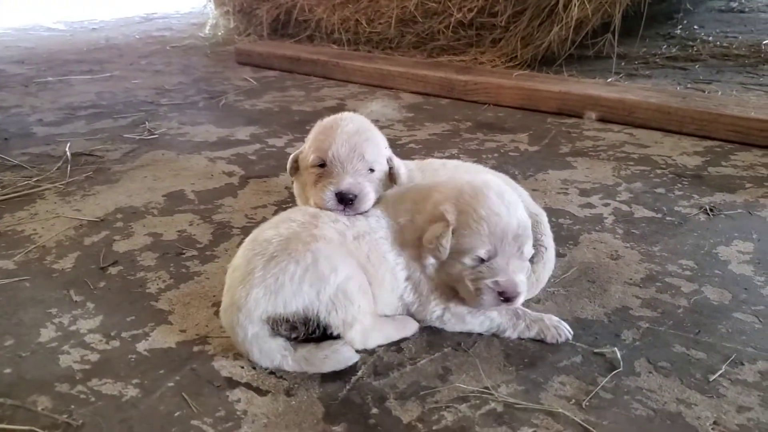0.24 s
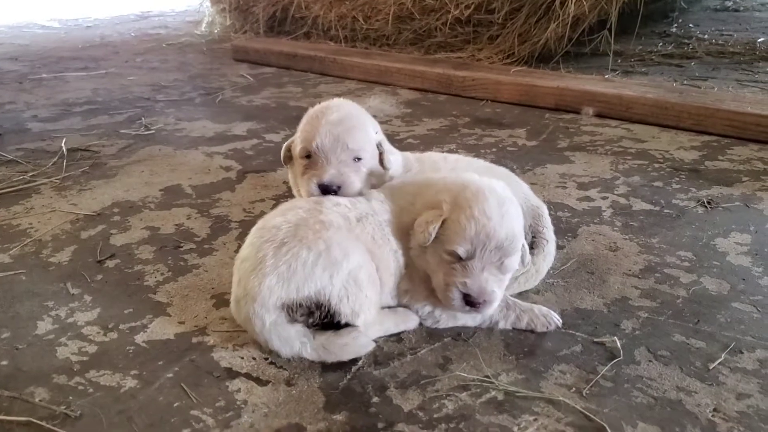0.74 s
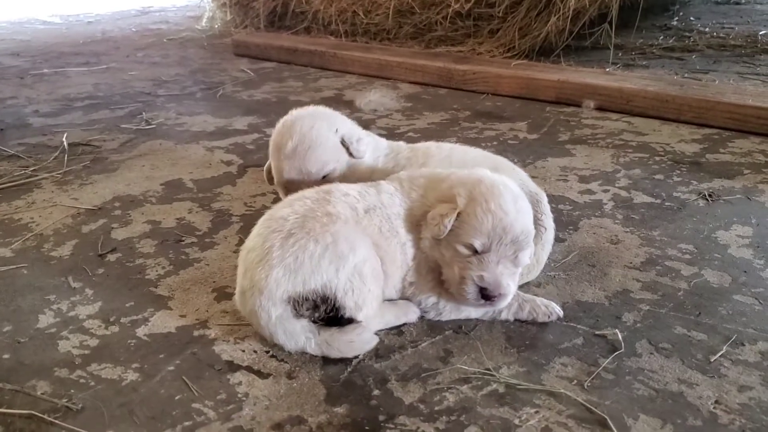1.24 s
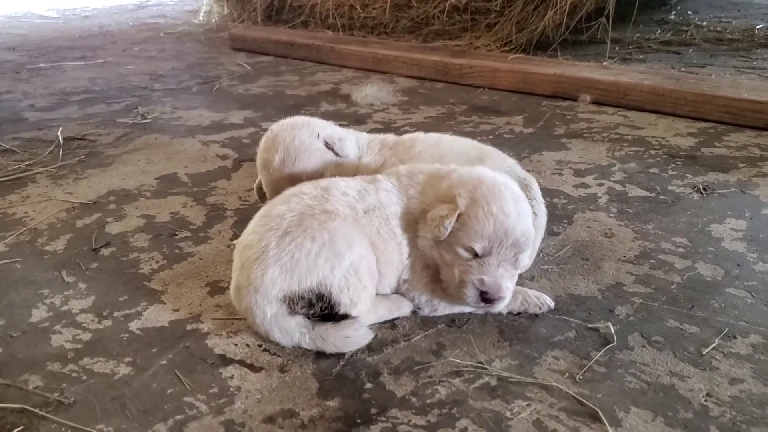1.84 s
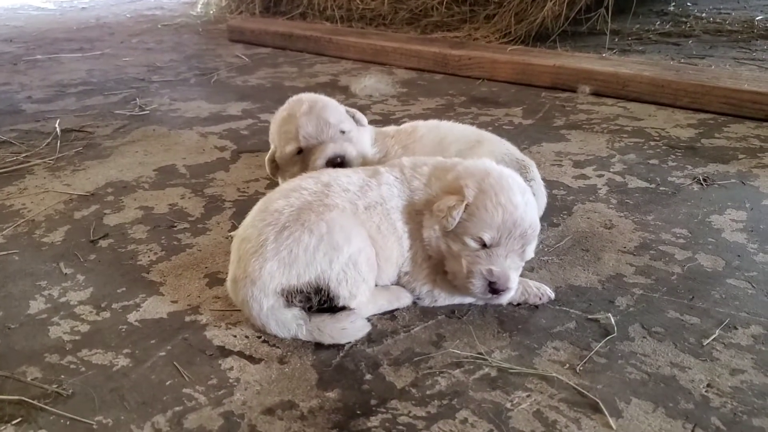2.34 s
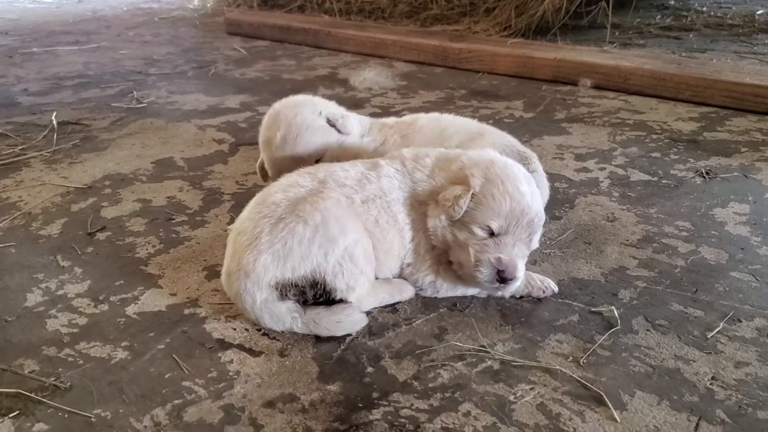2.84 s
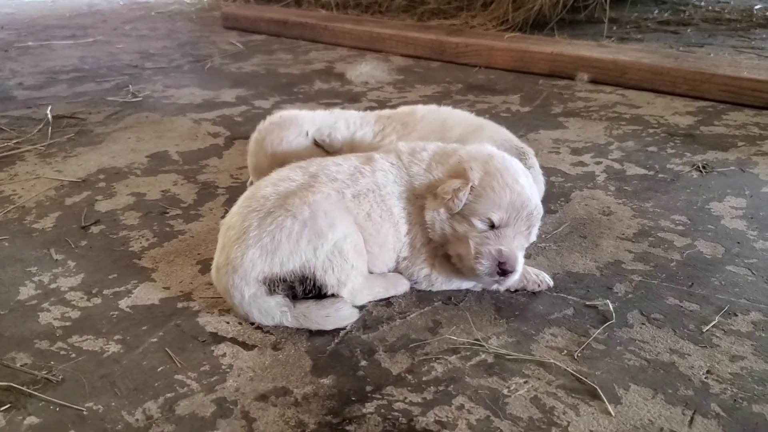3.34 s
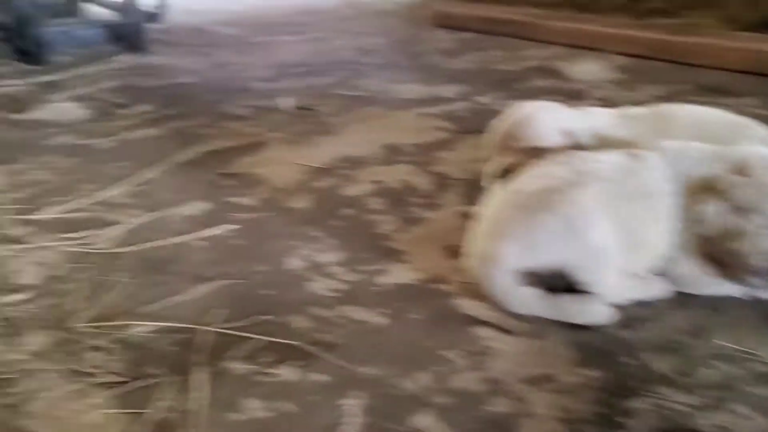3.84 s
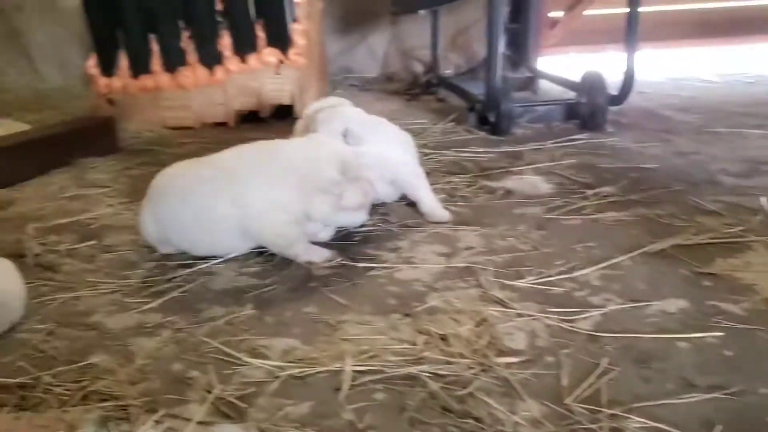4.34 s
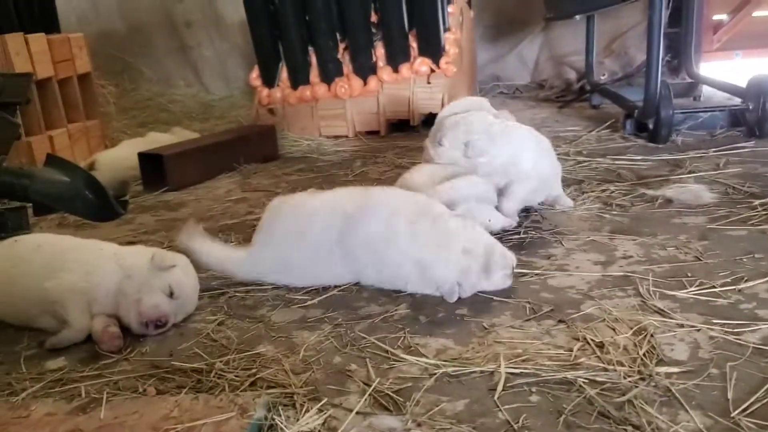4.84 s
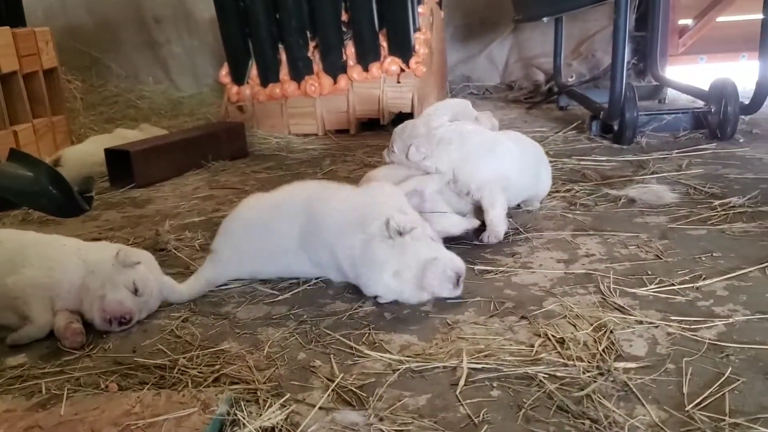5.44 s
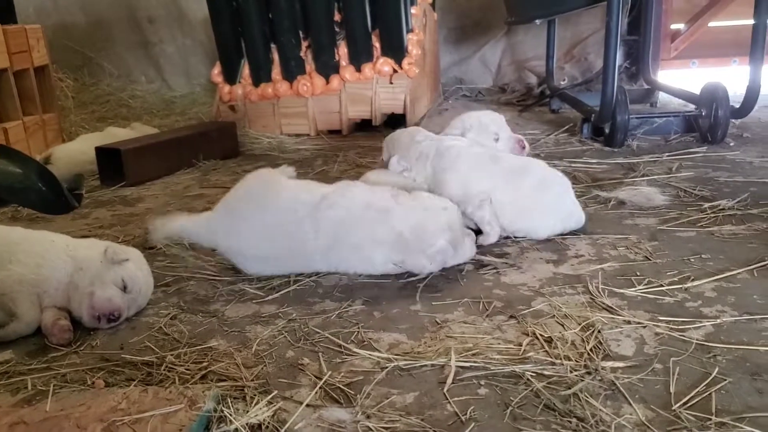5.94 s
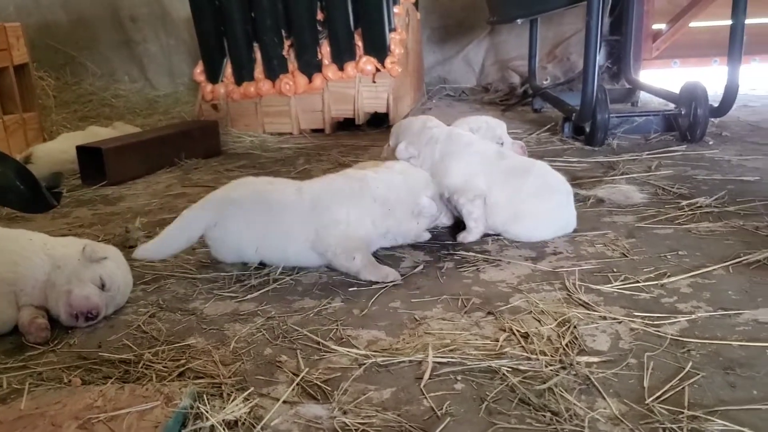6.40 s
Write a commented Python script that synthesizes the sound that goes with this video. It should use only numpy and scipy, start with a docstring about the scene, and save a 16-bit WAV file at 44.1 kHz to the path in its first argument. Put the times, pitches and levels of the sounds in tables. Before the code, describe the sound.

A young puppy, close to a hand-held phone in a barn, gives two short hoarse grunts, at the start and at 0.5 seconds. From 0.9 to 2 seconds it groans through its nose, the wavering pitch sinking and breaking into throat clicks. Between 2.3 and 3.3 seconds come four high, arching squeals, the last three the loudest, each with a brief echo. From 3.5 to about 6.2 seconds a run of short, lower whimpers follows, with soft nose puffs; the strongest rises in pitch at 5.1 seconds. Two very faint nose whistles come near 4.7 seconds. Dry taps sound close by, mostly on the right, clearest at about 1.5 and 2.8 seconds, with one on the left at 4 seconds. Faint paw scuffs on concrete and thin snaps of straw are scattered through. Still air and a low, uneven rumble lie underneath.

```python
"""Puppies on a barn floor

Young puppies lie on concrete, a step from a hand-held phone. One grunts twice and groans through its
nose until the voice breaks into clicks; four squeals and a run of short whimpers follow. Each voice is
a train of vocal-fold pulses coloured by snout, muzzle or mouth. Noses puff and squeak, paws scuff,
straw snaps and small taps sound up close, while the barn answers the louder calls over a low rumble."""
import sys
import numpy as np
from scipy import signal
from scipy.fft import rfft, irfft
from scipy.io import wavfile
from scipy.ndimage import uniform_filter1d, map_coordinates

SR = 44100
rng = np.random.default_rng(int(sys.argv[2]) if len(sys.argv) > 2 else 0)


def wav_out(sig):
    """Save sig, one row per channel (or a flat mono array), as 16-bit PCM at SR to the path in sys.argv[1]."""
    wavfile.write(sys.argv[1], SR, np.round(np.clip(np.atleast_2d(sig).T, -1, 1) * 32767).astype(np.int16))


N = 294147
T = np.arange(N) / SR

# EQ curves, all (frequency [Hz], gain [dB])
AIR_EQ = [(30, -5.5), (90, -8.5), (200, -16), (400, -26.5), (900, -26), (1700, -20.5), (3500, -30.5),
          (7000, -27.5), (14500, -28)]  # still barn air
RUMBLE_EQ = [(20, -13), (45, -8.5), (70, -2.5), (110, -9.5), (180, -19.5), (400, -30.5), (1500, -69)]  # hand and draught
BARN_EQ = [(100, -12), (500, 3), (1200, -3.5), (2500, 10.5), (5000, 3.5), (8000, 9.5), (14500, 5)]  # echo off walls and roof
NOSE_HISS_EQ = [(1000, 0), (2000, -3), (4000, -5.5), (6500, -7), (9000, -5.5), (12000, -0.5), (14500, 0.5)]  # breath through the nostrils
STRAW_EQ = [(800, -23), (3000, -4), (8000, -2), (13000, -2.5)]  # a snapping stalk
SCUFF_EQ = [(80, -13.5), (400, 5.5), (1400, -3), (2500, -7), (4300, -7.5), (7000, -20.5), (10000, -22.5),
            (14500, -25.5)]  # paws on concrete
CRACK_EQ = [(100, -5.5), (700, 7.5), (1500, 0.5), (3200, -9), (5300, -13.5), (9500, -24), (11500, -12.5),
            (14500, -30.5)]  # the attack of a tap
SNOUT_EQ = [(120, -24.5), (260, -2), (420, -5.5), (650, 4), (850, 4.5), (1100, -5), (1400, -13), (1900, -4),
            (2600, -44.5), (4500, -35.5), (9500, -22.5), (10800, -16), (12000, -32), (14500, -50)]  # voice through the nose
GROAN_AIR_EQ = [(1000, 5.5), (2000, -2.5), (4000, -7.5), (6500, -4), (9000, -8), (10700, -3), (12500, -4.5),
                (14500, -9.5)]  # air leaking with the groan
MUZZLE_EQ = [(120, -27.5), (250, -3.5), (520, -5.5), (850, -3), (1100, -11), (1380, -15), (1750, -12.5),
             (2300, -22), (2900, -39.5), (4000, -56), (5400, -34.5), (7000, -45.5), (11000, -32.5),
             (14500, -52)]  # voice through a nearly shut muzzle
MOUTH_SHUT_EQ = [(200, -28), (500, -8.5), (800, 4), (1300, -2.5), (1700, -7.5), (2500, -26), (3200, -32.5),
                 (4000, -51), (5200, -22), (6800, -36), (9500, -22), (11500, -39.5), (14500, -37)]  # squeal, mouth shut
MOUTH_OPEN_EQ = [(300, -40), (800, 2.5), (1300, 7.5), (1900, 4.5), (2500, -2.5), (3100, -17.5), (3750, -6),
                 (4300, -14.5), (4950, -6), (5800, -20), (7400, -10.5), (9500, -19.5), (11000, -39.5),
                 (14500, -39.5)]  # squeal, mouth open

# fader ride on the rumble of hand and draught: (time [s], gain [dB])
RUMBLE_RIDE = [(0, -60.5), (1.0, -55), (1.6, -55.5), (2.2, -58), (3.6, -64.5), (4.3, -62), (5.4, -59.5),
               (6.67, -61)]
# the phone turns to face the litter: (time [s], lead at the left port [ms])
BEARING = [(2.0, 0.387), (3.5, 0.445), (4.2, 0.2174), (4.9, 0.0512), (6.2, 0.072)]
# straws snapping: (time [s], peak [dB], left minus right [dB])
STRAW_SNAPS = [(0.653, -33, -15.5), (1.904, -38.5, -18), (1.916, -44.5, -20.5), (4.62, -45, 13.5),
               (4.949, -39.5, 11.5), (5.844, -47, 16.5), (6.109, -43.5, 4.5)]
# paws dragging: (centre [s], half width [s], level [dB], left minus right [dB])
SCUFFS = [(0.701, 0.0262, -53.5, -14), (0.748, 0.0462, -56.5, -11), (1.649, 0.034, -45, -17.5),
          (4.049, 0.0463, -55, 19.5)]
# close taps: (time [s], gain [dB], ring pitch [Hz], ring t60 [s], relative crack [dB],
#  relative thump [dB], left minus right [dB])
TAPS = [(0.653, -53.5, 600, 0.0091, -9, 3, -24), (0.683, -27.5, 584, 0.00526, -17.5, -11, -18.5),
        (1.4622, -18, 1138, 0.00288, -35, -19, -19.5), (1.605, -35, 1007, 0.0157, 1.5, -10, -14),
        (1.904, -38, 696, 0.017, 3.5, -9, -16), (2.097, -53, 4500, 0.006, -8, -18, -14.5),
        (2.7513, -15.5, 764, 0.014, -0.5, -20, -29.5), (3.354, -27.5, 795, 0.0106, 8, -36, -20),
        (3.9888, -24.5, 436, 0.02115, -12, -25.5, 28)]
# nose whistles: (time [s], length [s], start pitch [Hz], end pitch [Hz], level [dB])
SQUEAKS = [(4.624, .06, 3748, 2985, -65.5), (4.797, 0.08, 3320, 3520, -71.5)]
# hoarse grunts: (time [s], length [s], start pitch [Hz], pulse gain [dB])
GRUNTS = [(.002, 0.11, 243.3, -13.5), (.47, .088, 235.9, -12.5)]
# pitch line of the long groan: (time [s], pulse rate [Hz])
GROAN_PITCH = [(0.92, 179.9), (0.942, 208.7), (1.014, 188.8), (1.098, 216.2), (1.186, 209.9), (1.262, 226),
               (1.352, 194.5), (1.42, 210.6), (1.476, 172.7), (1.52, 200), (1.738, 137.7), (1.8, 95.55)]
# lone throat clicks after the groan: (time [s], pulse gain [dB])
THROAT_CLICKS = [(2.037, -18), (2.146, -16), (2.221, -26), (2.389, -10), (2.427, -15), (2.459, -16.5)]
# short low calls: (time [s], length [s], start pitch [Hz], crest pitch [Hz], end pitch [Hz],
#  level [dB], roughness [0-1], attack softness [exponent])
WHIMPERS = [ (1.813, 0.0417, 305.5, 321.2, 293.4, -44.5, 0.04, 0.7),
            (2.05, 0.0406, 328, 320.5, 300.6, -43, 0.05, 1.04),
            (3.47, 0.0619, 445.1, 429.4, 418, -34.5, 0.13, 0.265),
            (3.715, 0.032, 346.5, 354.2, 329, -43, 0.1, .35),
            (3.94, 0.0304, 346.5, 323, 318, -45, .09, 0.38),
            (4.169, 0.0439, 344.4, 368.6, 351.4, -39.5, 0.13, 0.445),
            (4.425, 0.0382, 202, 218.2, 217, -51.5, 0.07, .8),
            (4.689, 0.0419, 231, 258.6, 230.7, -58, 0.42, 1),
            (4.888, 0.046, 253, 246.5, 225.6, -43.5, 0.4, 1.18),
            (5.105, .094, 279.8, 420.7, 547.8, -28.5, .07, 1.49),
            (5.405, .058, 248.4, 326, 350.4, -35, 0.17, 0.79),
            (5.676, 0.0473, 273.3, 312.2, 251.1, -38, 0.13, 0.79),
            (5.924, 0.0395, 229.6, 257.4, 227, -56.5, 0.34, 1),
            (6.143, 0.0485, 198.1, 214.6, 223.4, -51, 0.09, 1)]
# high cries: (time [s], length [s], low pitch [Hz], top pitch [Hz], climb after [s], crest after [s],
#  slide from the crest [Hz/s], open-mouth level [dB], mouth opens after [s], added opening [0-1],
#  rasp after [s], rasp half width [s], rasp [0-1])
SQUEALS = [ (2.279, 0.06365, 745.7, 924.2, .024, 0.052, -1500, -24.5, 0.0307, 0, .044, .009, 1),
           (2.506, 0.1254, 735.4, 1344, .03, 0.0534, -3400, -13, .078, 0.5, .074, 0.022, 0.1),
           (2.793, .124, 616.9, 1278, .03, .064, 9001.5, -13.5, .054, 0.36, .078, .022, .78),
           (3.102, 0.1511, 626, 1348, 0.03012, 0.0664, -3700, -10, 0.05884, .3, 0.0644, 0.017, 0.16)]

PLAIN_DB = -40.5  # a middling whimper; louder ones are brighter and end in a stronger puff


def undb(db):
    """Decibels to gain."""
    return 10 ** (np.asarray(db) / 20)


def unit(x):
    """Scale to rms 1."""
    return x / np.sqrt(np.mean(x ** 2))


def steady(x, window_s=0.0074):
    """Hold the short-term rms at 1."""
    return x / np.sqrt(np.abs(uniform_filter1d(x ** 2, int(window_s * SR))) + 1e-9)


def ramp(x):
    """Rise from 0 to 1 and stay there."""
    return np.clip(x, 0, 1)


def ease(x):
    """Smooth step from 0 to 1 around x = 0."""
    return (1 + np.tanh(x / 2)) / 2


def waver(size, rate_hz=45):
    """Smooth random modulation of rms 1."""
    width = int(SR / rate_hz)
    return unit(uniform_filter1d(uniform_filter1d(rng.standard_normal(size), width), width))


def colour(x, curve):
    """Minimum-phase EQ along a curve of (frequency [Hz], gain [dB])."""
    size = 2048
    hz, db = np.transpose(curve)
    grid = np.maximum(np.fft.rfftfreq(size, 1 / SR), 1)
    cepstrum = irfft(np.log(undb(np.interp(np.log(grid), np.log(hz), db))))
    cepstrum[1:size // 2] *= 2
    cepstrum[size // 2 + 1:] = 0
    return signal.fftconvolve(x, irfft(np.exp(rfft(cepstrum))))[:len(x)]


def noise(curve, size=N):
    """Coloured noise of rms 1."""
    return unit(colour(rng.standard_normal(size), curve))


def wide_noise(curve):
    """Coloured noise, independent left and right."""
    return np.array([noise(curve), noise(curve)])


def place(x, pan_db=0, lead_ms=0):
    """Pan between two microphone ports: the nearer one hears it earlier or louder."""
    late = map_coordinates(x, [np.arange(len(x)) - lead_ms * SR / 1000], order=5)
    return np.array([x * undb(pan_db / 2), late * undb(-pan_db / 2)])


def add(out, start, x):
    """Mix a sound in at a start time in seconds."""
    i = max(int(start * SR), 0)
    out[:, i:i + x.shape[1]] += x[:, :N - i]


def background(trim_db=-3):
    """The bed: still barn air and the uneven rumble of hand and draught."""
    air = wide_noise(AIR_EQ) * undb(-63.5)
    rumble = place(noise(RUMBLE_EQ), pan_db=-2) + wide_noise(RUMBLE_EQ)
    return air + rumble * undb(np.interp(T, *np.transpose(RUMBLE_RIDE)) + trim_db)


def barn(send, low_t60=0.232, high_t60=0.3415, predelay_s=0.0015, build_s=0.0015):
    """Diffuse echo of walls and roof in two bands, different at each port."""
    t = np.arange(int(.7 * SR)) / SR
    out = []
    for channel in send:
        low = noise([(1500, -6.0), (4000, -21.5), (9000, -47)], len(t))
        high = noise([(1000, -29.5), (3000, 0.0)], len(t))
        tail = 0.5244 * low * undb(-60 * t / low_t60) + high * undb(-60 * t / high_t60)
        tail *= ramp((t - predelay_s) / build_s)
        response = colour(tail / np.linalg.norm(tail), BARN_EQ)
        out.append(signal.fftconvolve(channel, response)[:N])
    return np.array(out)


def nose(snuffle_db=-79, puff_db=-64, puff_delay_s=.014, puff_half_s=.038):
    """Thin hiss from the nostrils: faint snuffling, and a puff as each whimper ends."""
    flow = undb(snuffle_db + 4 * waver(N, rate_hz=27))
    for start, length, _, _, _, db, _, _ in WHIMPERS:
        puff = np.exp(-((T - start - length - puff_delay_s) / puff_half_s) ** 2)
        flow += puff * undb(puff_db + 1.0454 * (db - PLAIN_DB))
    hiss = noise(NOSE_HISS_EQ) + wide_noise(NOSE_HISS_EQ)
    return hiss * flow


def straw(t60=0.0115):
    """Dry stalks give way with a thin tick."""
    out = np.zeros((2, N))
    t = np.arange(SR // 20) / SR
    for start, db, pan_db in STRAW_SNAPS:
        snap = noise(STRAW_EQ, len(t)) * undb(-60 * t / t60)
        add(out, start, place(snap / np.abs(snap).max() * undb(db), pan_db))
    return out


def scuffs(grain_db=3.5):
    """Paws and fur drag over gritty concrete in swells of tiny slips."""
    out = np.zeros((2, N))
    for centre, half, db, pan_db in SCUFFS:
        u = np.linspace(-2, 2, int(4 * half * SR))
        slips = rng.standard_normal(len(u))
        slips *= undb(grain_db * np.minimum(rng.exponential(size=len(u)), 2 * np.pi))
        drag = unit(colour(slips, SCUFF_EQ)) * np.exp(-u ** 2)
        add(out, centre - 2 * half, place(drag * undb(db), pan_db))
    return out


def taps(ring_db=-3, crack_t60=0.0033, grit=0.25, thump_hz=78, thump_t60=0.068):
    """Dry taps close to the microphone: a crack, a dead ring and a soft thump."""
    out = np.zeros((2, N))
    t = np.arange(SR // 10) / SR
    for start, db, ring_hz, ring_t60, crack_db, thump_db, pan_db in TAPS:
        contact = (t == 0) + grit * rng.standard_normal(len(t)) * undb(-60 * t / crack_t60)
        crack = colour(contact, CRACK_EQ)
        crack *= undb(crack_db) / np.abs(crack).max()
        ring = np.sin(2 * np.pi * ring_hz * t) * undb(ring_db - 60 * t / ring_t60)
        thump = np.sin(2 * np.pi * thump_hz * t) * undb(thump_db - 60 * t / thump_t60)
        add(out, start, place((crack + ring + thump) * undb(db), pan_db))
    return out


def squeaks(wobble=.05):
    """Faint, unsteady whistles from a puppy's nose."""
    out = np.zeros((2, N))
    for start, length, start_hz, end_hz, db in SQUEAKS:
        u = np.linspace(0, 1, int(length * SR))
        hz = (start_hz + (end_hz - start_hz) * u) * (1 + wobble * waver(len(u), rate_hz=500))
        whistle = np.sin(2 * np.pi * np.cumsum(hz) / SR) * np.sin(np.pi * u)
        add(out, start, place(whistle * undb(db)))
    return out


def folds(hz, roughness, jitter=0.4246, shimmer_db=4, doubling=0.49, leak=0.418):
    """Vocal folds pulse once a cycle; roughness scatters pulses, weakens every second one, leaks air."""
    phase = np.cumsum(hz) / SR
    cycles = np.arange(1, int(phase[-1]))
    at = np.interp(cycles, phase, np.arange(len(hz)))
    rough = ramp(roughness[at.astype(int)])
    chance = rng.standard_normal((len(at), 2))
    at = at + jitter * rough * chance[:, 0] * SR / hz[at.astype(int)]
    strength = undb(shimmer_db * rough * chance[:, 1]) * (1 + doubling * rough * (-1) ** cycles)
    # a windowed sinc lets each pulse land between samples
    samples = at.astype(int)[:, None] + np.arange(-7, 9)
    offset = samples - at[:, None]
    shapes = strength[:, None] * np.sinc(offset) * np.cos(np.pi * offset / 16) ** 2
    pulses = np.bincount(np.clip(samples, 0, len(hz) - 1).ravel(), shapes.ravel(), len(hz))
    airflow = leak * roughness * np.sqrt(hz / SR) * (1 + np.cos(2 * np.pi * phase))
    return pulses - hz / SR + airflow * rng.standard_normal(len(hz))


def grunts(sag=0.52, roughness=0.186):
    """Short hoarse grunts through the snout that swell and sag in pitch."""
    out = np.zeros((2, N))
    for start, length, start_hz, db in GRUNTS:
        u = np.linspace(0, 1, int(length * SR))
        pulses = folds(start_hz * (1 - sag * u ** 2), np.full(len(u), roughness))
        swell = np.abs(np.sin(np.pi * u)) ** 1.52
        voice = colour(pulses * swell * undb(db), SNOUT_EQ)
        muffled = colour(voice, [(450, 2.5), (1600, -4.5)])  # by fur
        add(out, start, place(muffled, pan_db=-1))
    return out


def groan(start_s=.912, crest_s=1.307, end_s=2.03, attack_s=0.023, release_s=0.154, slacken_s=.27):
    """Slack, wavering folds ring the snout and slow into single clicks; air leaks most at the crest."""
    pulse_db, fade_db_per_s, tremble_db = -12.5, -8, 1.22
    roughness, wobble = .07, .008
    air_db, air_half_s = -51.5, 0.259
    times, pitches = np.transpose(GROAN_PITCH)
    t = np.arange(start_s, end_s, 1 / SR)
    slowing = np.exp(-np.maximum(t - times[-1], 0) / slacken_s)
    hz = np.interp(t, times, pitches) * slowing * (1 + wobble * waver(len(t)))
    db = pulse_db + fade_db_per_s * np.abs(t - crest_s) + tremble_db * waver(len(t))
    envelope = undb(db) * ramp((t - start_s) / attack_s) * ramp((t[-1] - t) / release_s) ** .5
    pulses = np.zeros((1, N))
    add(pulses, start_s, folds(hz, np.full(len(t), roughness))[None] * envelope)
    for at, click_db in THROAT_CLICKS:
        pulses[0, int(at * SR)] += undb(click_db)
    leak = undb(air_db) * np.exp(-((T - crest_s) / air_half_s) ** 2)
    return place(colour(pulses[0], SNOUT_EQ), pan_db=-1) + leak * wide_noise(GROAN_AIR_EQ)


def whimpers(crest=.55, fray=4.186, brightening=1.105, scatter=.02, scatter_t60=.075):
    """Short low calls through a nearly shut muzzle, each swelling and dying away."""
    out = np.zeros((2, N))
    t = np.arange(SR // 40) / SR
    for start, length, start_hz, crest_hz, end_hz, db, roughness, softness in WHIMPERS:
        u = np.linspace(0, 1, int(length * SR))
        hz = np.interp(u, [0, crest, 1], [start_hz, crest_hz, end_hz])
        voice = colour(folds(hz, roughness * fray * u ** 2), MUZZLE_EQ)  # starts clean, then frays
        voice = colour(voice, [(305.8, 0), (1287, brightening * (db - PLAIN_DB))])
        # the muzzle opens with the push and lets the upper overtones out
        push = np.interp(u, [0, crest, 1], [0, 1, 0]) ** np.where(u < crest, softness, .9)
        voice = push * voice + (1 - push) * colour(voice, [(700, -0.5), (2200, -15.5)])
        # floor and litter mates scatter it within milliseconds
        reflections = (t == 0) + scatter * rng.standard_normal(len(t)) * undb(-60 * t / scatter_t60)
        voice = signal.fftconvolve(voice, reflections)[:len(u)]
        lead_ms = np.interp(start, *np.transpose(BEARING))
        add(out, start, place(unit(voice) * push * undb(db), lead_ms=lead_ms))
    return out


def squeals(attack_s=0.0069, release_s=0.0233, fade_db_per_s=-110, shake_db=1.93):
    """High arching cries; the overtones burst out as the mouth opens."""
    start_hz, dip_s, climb_s = 955.4, .004, .005
    quaver, drop, drop_s = .012, 0.24, .026
    shut_db, strain_db_per_octave = -29.5, 6.5
    opening_s, ajar, shut_rough, open_rough = .002, .02, .11, .07
    out = np.zeros((2, N))
    for (start, length, low_hz, top_hz, climb_at, crest_at, slide,
         open_db, open_at, gape, rasp_at, rasp_half, rasp) in SQUEALS:
        t = np.arange(int(length * SR)) / SR
        # pitch: a dip from above, a climb, a slide from the crest on, a drop at the end
        climb_hz = low_hz + (top_hz - low_hz) * ease((t - climb_at) / climb_s)
        hz = climb_hz + (start_hz - low_hz) * np.exp(-t / dip_s) + slide * np.maximum(t - crest_at, 0)
        hz *= 1 - drop * ramp(1 - (length - t) / drop_s) ** 1.4
        hz *= 1 + quaver * ramp((t - climb_at) / climb_s) * waver(len(t), rate_hz=220)
        # level: grows with the climb while the mouth is shut, jumps as it opens, then fades
        opened = ease((t - open_at) / opening_s)
        strained_db = shut_db + strain_db_per_octave * np.log2(climb_hz / low_hz)
        db = (1 - opened) * strained_db + opened * (open_db + fade_db_per_s * (t - open_at))
        db += shake_db * waver(len(t), rate_hz=300)
        envelope = undb(db) * ramp(t / attack_s) * ramp((length - t) / release_s)
        rasp_burst = rasp * np.exp(-((t - rasp_at) / rasp_half) ** 2)
        roughness = ramp((1 - opened) * shut_rough + opened * open_rough + rasp_burst)
        pulses = folds(hz, roughness ** 1.5)  # clean until the folds are driven hard
        mouth = ramp(ajar + gape * opened)
        voice = (1 - mouth) * colour(pulses, MOUTH_SHUT_EQ) + mouth * colour(pulses, MOUTH_OPEN_EQ)
        voice = colour(voice, [(top_hz * .22, -14), (top_hz * .45, 0)])  # little rasp below the pitch
        add(out, start, place(steady(voice) * envelope, lead_ms=0.4545))
    return out


def scene(cries_send_db=-12, near_send_db=-26):
    """The mix: the cries fill the barn; the small sounds close by stay almost dry."""
    cries = squeals() + whimpers() + squeaks()
    near = grunts() + groan() + taps() + scuffs() + straw()
    echo = barn(cries * undb(cries_send_db) + near * undb(near_send_db))
    return cries + near + echo + nose() + background()


def record(dry, low_hz=38, top_hz=14600):
    """The phone drops the deepest bass and cuts the top."""
    low_cut = signal.sosfilt(signal.butter(2, low_hz, "high", fs=SR, output="sos"), dry)
    return signal.sosfilt(signal.ellip(10, .2, 80, top_hz, fs=SR, output="sos"), low_cut)


dry = scene()
out = record(dry)
wav_out(out)
```